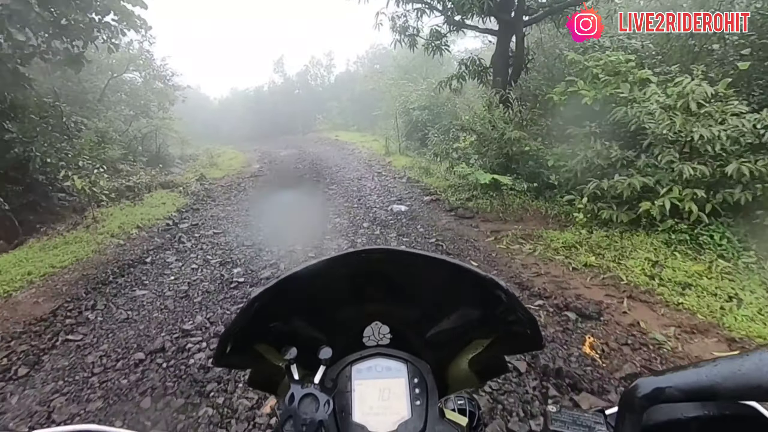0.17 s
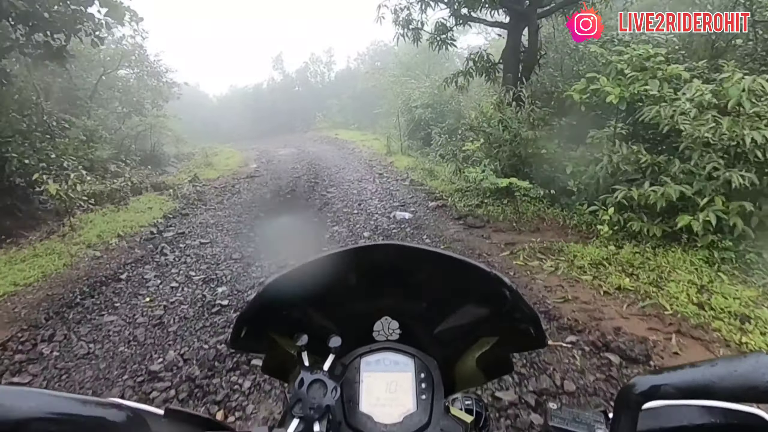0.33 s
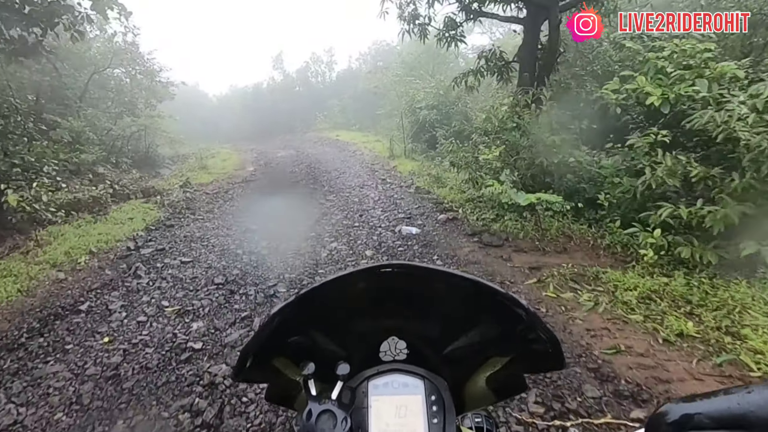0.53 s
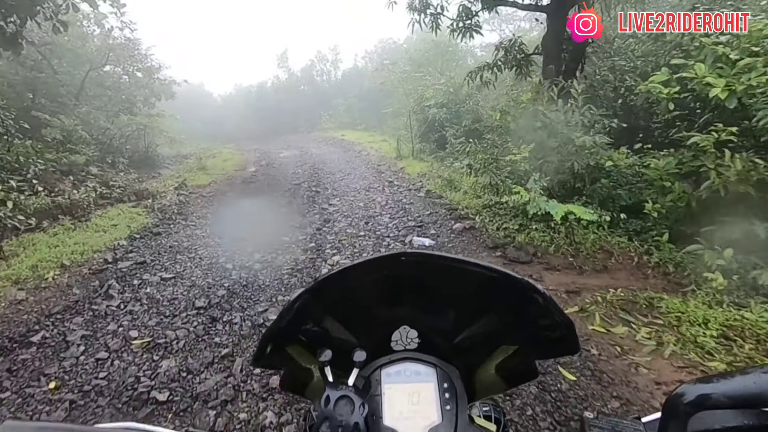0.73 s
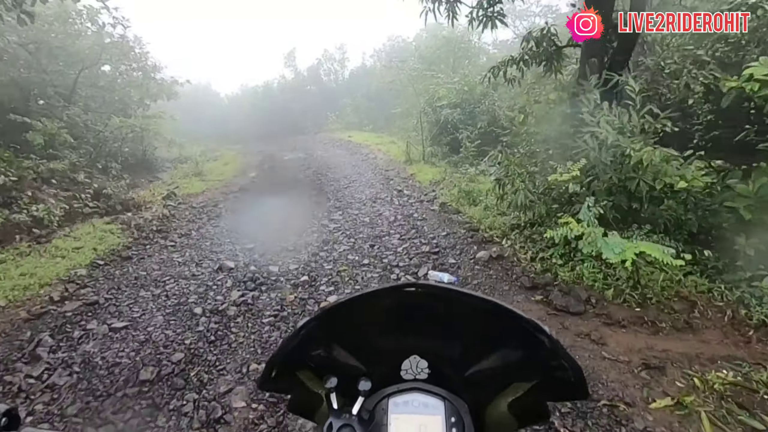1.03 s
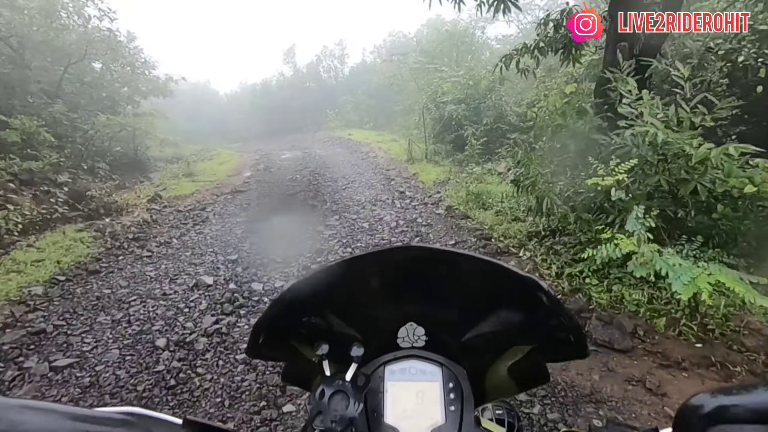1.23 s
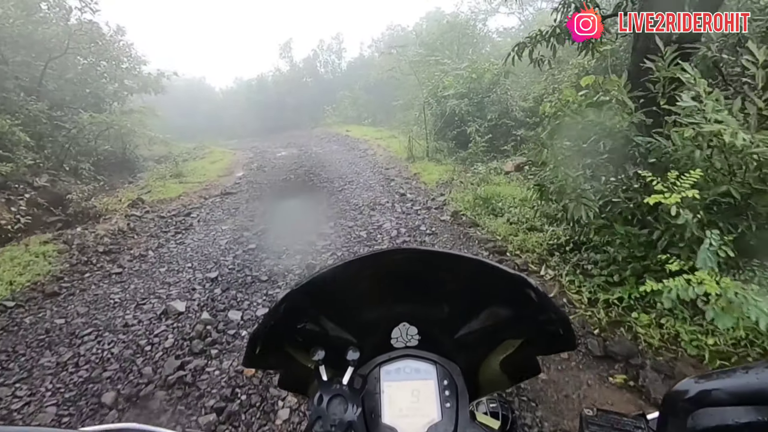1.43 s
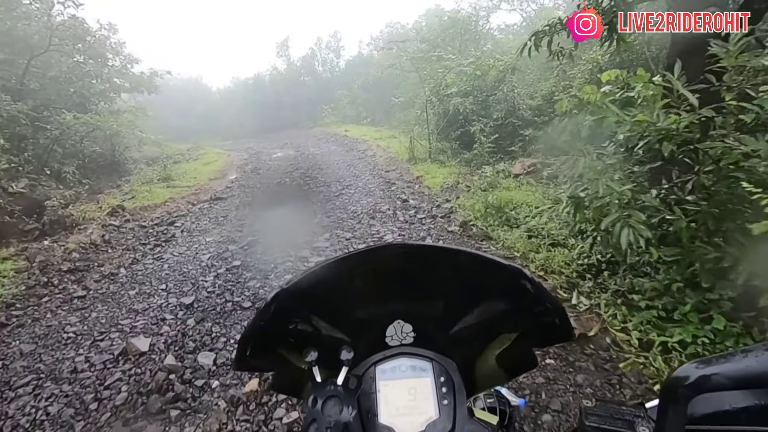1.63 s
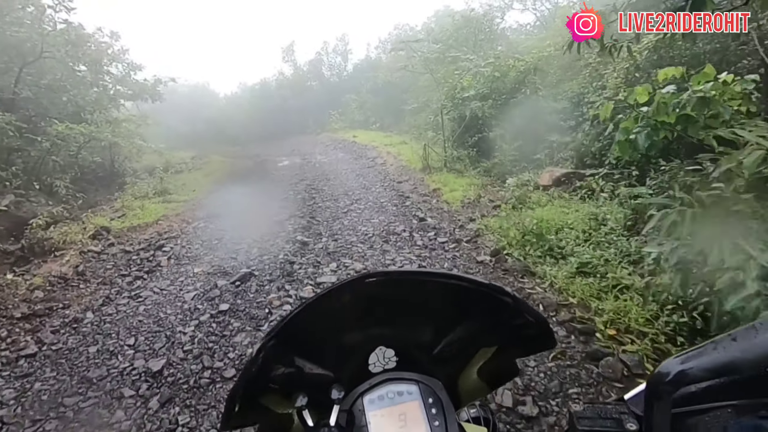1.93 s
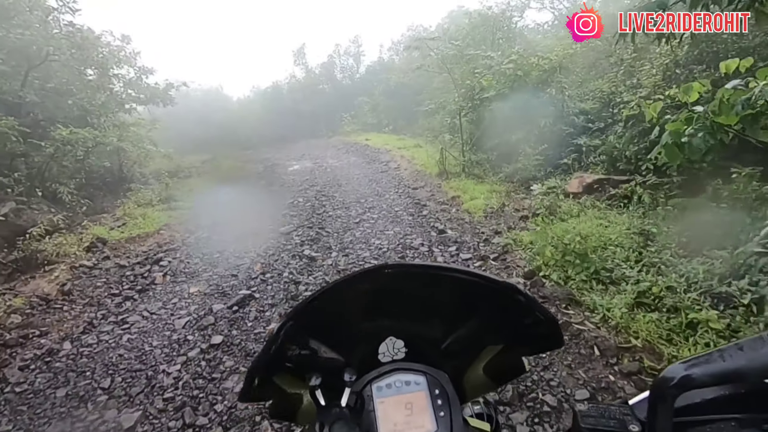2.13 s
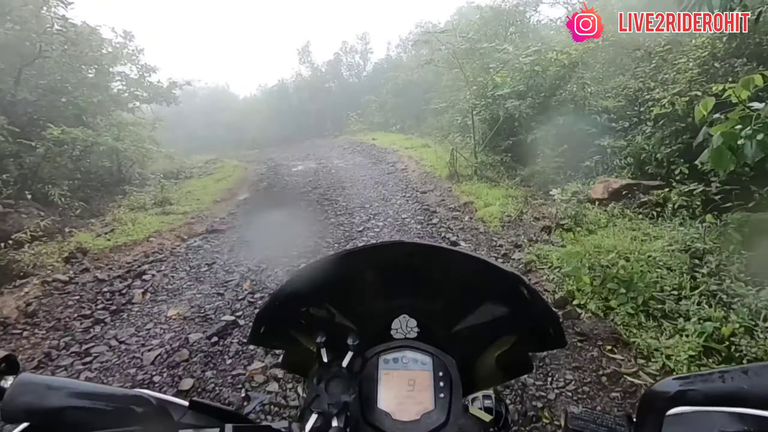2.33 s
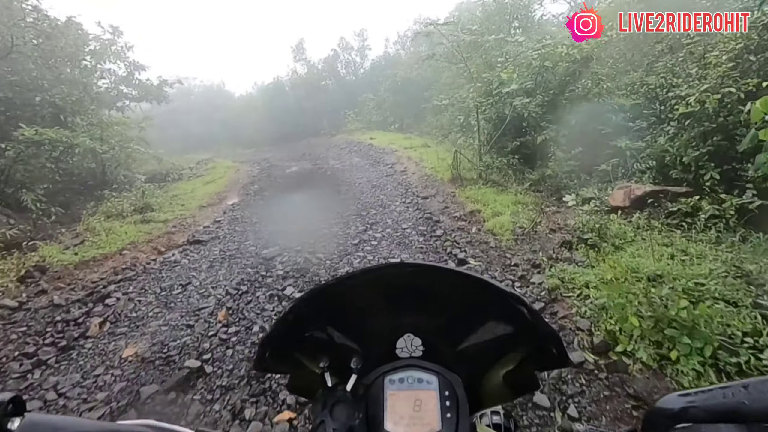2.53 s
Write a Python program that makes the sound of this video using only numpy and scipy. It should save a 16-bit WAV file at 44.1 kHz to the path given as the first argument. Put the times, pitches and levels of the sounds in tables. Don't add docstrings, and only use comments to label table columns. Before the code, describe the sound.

Close, muffled single-cylinder motorcycle chugging at low speed on a wet gravel track, each firing a separate low thump with valve clatter and a thin gear whine. Tyres rumble unevenly, stones clack against the frame and the fork knocks. After about four and a half seconds the sound cuts dead for a fifth of a second, then quickly fades in much louder, with a second deeper exhaust thudding at its own pace.

```python
import sys
import numpy as np
from scipy import signal
from scipy.fft import rfft, irfft, next_fast_len
from scipy.io import wavfile
from scipy.ndimage import uniform_filter1d, map_coordinates

SR = 44100
rng = np.random.default_rng(int(sys.argv[2]) if len(sys.argv) > 2 else 0)


def digitize_waveform(pressure):
    field = np.atleast_2d(pressure).T
    bounded = np.clip(field, -1, 1)
    quanta = np.round(bounded * 32767).astype(np.int16)
    wavfile.write(sys.argv[1], SR, quanta)


def volts(x):
    e = np.asarray(x, float) / 20
    return 10 ** e


N = 268260
T = np.arange(N) / SR
CUT_S = 4.4236

# time in seconds, firings a second.
ENGINE_SPEED = [
    [(0.027, 17.9), (0.647, 15.92), (0.739, 16.79), (0.977, 18.38), (1.789, 17.05), (2.58, 16.74),
     (2.582, 18.2), (3.09, 19.65), (3.595, 13.29), (4.096, 23.08), (4.393, 20.4), (4.424, 17.25)],
    [(4.635, 13.9), (4.665, 13.25), (5.809, 15.13), (6.009, 22.13), (6.045, 21.1)],
]
# time in seconds, thump peak in dB, pipe ring peak in dB.
THROTTLE = [(0, -11.5, -12), (.2, -16.5, -17), (.45, -10.5, -21.5), (.75, -18, -31), (1.1, -13, -16),
            (1.3, -17, -20.5), (1.7, -8, -9.5), (1.96, -15, -15.5), (2.24, -10, -13), (2.55, -11.5, -16.5),
            (2.85, -12.5, -20.5), (3.32, -10.5, -10.5), (3.5, -8, -23.5), (4.3, -14.5, -12.5),
            (4.8, -4, -22), (5.15, -7.5, -21.5), (5.6, -4, -32.5), (6.06, -1, -1.5)]
# pitch in Hz, level in dB, swell in seconds, lead on the firing in seconds.
THUMP_MODES = [(168, 10.3, .0021, .0038), (64, -5.4, .006, .0002), (197, 5.5, .003, .0056)]
# pitch in Hz, level in dB, swell in seconds, lead in seconds.
RING_MODES = [(420, -6.5, .002, .0018), (452, -12, .0055, .0017), (285, -13.5, .0024, .0027)]
# frequency in Hz, density in dB per Hz.
RASP_COLOUR = [(150, -29.5), (250, -3.5), (330, -4), (400, 0.5), (460, 0), (505, -9), (570, -7),
               (630, -19.5), (780, -18), (1600, -67.5)]
# frequency in Hz, density in dB per Hz.
CLATTER_CRUISING = [(350, -33), (600, -8.5), (830, -12.5), (922, -9), (1050, -8.5), (1210, -9.5),
                    (1290, -8), (1390, -9.5), (1720, -16), (2490, -17.5), (3100, -14.5), (4020, -21),
                    (4960, -17.5), (5250, -23.5), (5890, -35.5), (7660, -62), (13000, -120)]
# frequency in Hz, density in dB per Hz.
CLATTER_LABOURING = [(350, -28), (600, -16.5), (667, 2), (733, -3), (905, 1), (1260, -4.5), (1360, -4),
                     (1820, 0), (2120, -8), (2740, 0.5), (3790, -9.5), (4510, -3.5), (4820, -9),
                     (5460, -32.5), (5890, -24), (7660, -67.5), (13000, -120)]
# frequency in Hz, density in dB per Hz.
CLATTER_EASING = [(350, -25.5), (600, -16), (777, -16.5), (846, 0.5), (986, -0.5), (1210, -1.5), (2160, -9),
                  (2960, -8), (4380, -11.5), (4640, -12), (5100, -35), (5460, -23), (5890, -23),
                  (7660, -50.5), (13000, -120)]
# time in seconds, shares (0 to 1) of cruising, labouring and easing.
STAGES = [
    (0, 1, 0, 0),
    (4.5, 1, 0, 0),
    (4.55, 0, 1, 0),
    (5.1, 0, 1, 0),
    (5.3, 0, 0, 1),
]
# time in seconds, tooth pitch in Hz, tooth load in dB.
GEARS = [(0, 1070, -46.5), (.33, 1037, -46.5), (.62, 1070, -56), (.92, 1126, -42.5), (1.28, 1084, -42),
         (1.6, 1070, -40.5), (2.46, 1034, -38), (2.78, 1131, -40.5), (3.05, 1180, -40.5), (3.21, 1060, -38),
         (3.61, 1030, -45), (3.94, 1150, -41.5), (4.41, 1191, -41.5), (4.7, 1037, -46), (5.06, 1090, -44),
         (5.25, 1012, -48.5), (5.78, 1060, -51.5), (6, 1224, -38)]
# time in seconds, firings so far.
DEEP_FIRINGS = [
    [(4.686, 0), (5.001, 4), (5.075, 5), (5.203, 7), (5.429, 11), (5.542, 13), (5.664, 15), (5.998, 20),
     (6.062, 21)],
]
# time in seconds, thud peak in dB.
DEEP_LEVEL = [(4.76, -3.5), (5.02, 0.5), (5.28, -0.6), (5.54, 0.5), (5.8, -0.5), (6.06, -1.5)]
# pitch in Hz, level in dB, swell in seconds, lead in seconds.
THUD_MODES = [(120, 4.6, .004, .0061), (70, -5.2, .0062, .0021), (168, -10, .0056, .0044)]
# time in seconds, frame rumble in dB.
GROUND = [(0, -23), (.3, -18), (.55, -29), (.8, -20.5), (.93, -28.5), (1.18, -24), (1.5, -25), (1.72, -23),
          (2.1, -26), (2.68, -25), (2.9, -20), (3.18, -29), (3.6, -17.5), (3.85, -26), (4.05, -20.5),
          (4.3, -24.5), (4.75, -18), (6, -17)]
# frequency in Hz, density in dB per Hz.
RUMBLE_COLOUR = [(15, -28.5), (25, -6), (45, 0), (80, 0.5), (120, -2.5), (170, -6), (230, -9.5),
                 (320, -18.5), (600, -23), (1200, -88)]
# start in seconds,
# crack peak in dB, dull part over it in dB.
STONES = [(0.241, -37, 10), (0.3913, -36, 6), (1.28, -21, -27), (1.512, -24, 9), (1.5727, -23, 11),
          (2.737, -36, -11), (2.784, -38, -1), (2.938, -26, -2), (3.449, -18, 5), (3.513, -28, 15),
          (3.5864, -25.5, 13), (3.65, -22, 7), (3.7778, -23, 5), (4.0785, -33, 14), (4.3042, -43, 15),
          (4.81, -19, 6.5), (5.056, -20, 0), (5.4725, -23.5, 1.5)]
# frequency in Hz, density in dB per Hz.
CRACK_COLOUR = [(600, -19.5), (1100, 12.5), (1900, 13), (2600, -11), (5000, -8.5), (5800, -45.0), (16000, -90.5)]
DULL_COLOUR = [(150, -28.5), (400, -3), (900, -7), (1300, -25.5), (4000, -76.5)]
# start in seconds, peak in dB.
GUARD_HITS = [
    (.362, -24),
    (.674, -19),
    (.776, -27),
    (3.52, -26),
    (3.62, -23),
    (4.075, -22),
]
# frequency in Hz, density in dB per Hz.
GUARD_COLOUR = [(150, -12), (350, 0), (800, -5), (1200, -14), (2500, -30), (6000, -80)]
# start in seconds,
# peak in dB, pitch in Hz.
JOLTS = [(0.247, -28, 109), (0.319, -16, 138), (0.345, -10, 69.6), (0.369, -7, 177), (0.68, -9.5, 149),
         (.778, -5.5, 143), (0.811, -13, 88), (3.018, -17, 88), (3.47, -8, 153), (3.58, -17, 129),
         (3.627, -11, 143), (3.654, -8, 146), (3.685, -12, 130), (4.069, -9.5, 106), (4.705, -15.5, 127),
         (4.94, 2, 130)]
# frequency in Hz, density in dB per Hz.
SPRAY_COLOUR = [(4800, -38), (5600, -20.5), (6500, 0.5), (7300, -8.5), (8200, -9.5), (10000, -28)]
# frequency in Hz, density in dB per Hz.
DRIZZLE_COLOUR = [(6000, -14), (7500, -3), (9000, -3), (12000, -2), (13300, -5), (14000, -26.5),
                  (15500, -46)]
# time in seconds, level in dB.
FADE = [(4.6, -120), (4.61, -56), (4.63, -24.5), (4.65, -6.5), (4.7, 0.5), (4.75, -0.5)]


def unit(x):
    return x / np.sqrt(np.mean(x ** 2) + 1e-20)


def curves(rows):
    s, *columns = np.transpose(rows)
    return [np.interp(T, s, column) for column in columns]


def stage_db(levels_db):
    return np.dot(levels_db, curves(STAGES))


def wobble(rate):
    return map_coordinates(rng.standard_normal(int(N * rate / SR) + 4), [T * rate])


def hiss(spectrum):
    m = next_fast_len(N + 8192)
    hz, db = np.transpose(spectrum)
    log_hz = np.log(np.fft.rfftfreq(m, 1 / SR) + 1)
    gain = volts(np.interp(log_hz, np.log(hz), db))
    return unit(irfft(rfft(rng.standard_normal(m)) * gain, m)[:N])


def lay(times, shapes):
    start = np.round(times * SR).astype(int)[:, None]
    at = np.clip(start + np.arange(shapes.shape[1]), 0, N)
    return np.bincount(at.ravel(), shapes.ravel(), N + 1)[:N]


def hit(t, db, die_s, rise_s):
    return volts(db - 60 * t / die_s) * (1 - np.exp(-(t / rise_s) ** 2))


def crank(speed):
    s = T[(T >= speed[0][0]) & (T <= speed[-1][0])]
    rate = curves(speed)[0][round(s[0] * SR):][:len(s)]
    return np.transpose([s, np.cumsum(rate) / SR])


def firings(tables):
    columns = map(np.transpose, tables)
    return np.concatenate([np.interp(np.arange(int(count[-1]) + 1), count, s) for s, count in columns])


def puffs(times, modes, scatter_db, detune):
    out = np.zeros(N)
    t = np.arange(SR // 12) / SR
    size, pitch = rng.standard_normal((len(times), 2)).T[:, :, None]
    for hz, db, swell, lead in modes:
        u = t / swell
        swing = np.sin(2 * np.pi * hz * (1 + detune * pitch) * t)
        out += lay(times - lead, volts(db + scatter_db * size) * u * u * np.exp(-u) * swing)
    return out


def strokes(times, lead, length, scatter_db):
    u = np.arange(SR // 12) / SR / length
    size = volts(scatter_db * rng.standard_normal((len(times), 1)))
    return lay(times - lead, size * u * np.exp(1 - u))


def own_bike():
    times = firings(map(crank, ENGINE_SPEED))
    return exhaust(times) + exhaust_rasp(times) + valve_clatter(times) + gear_whine(times)


def exhaust(times):
    thump_db, ring_db = curves(THROTTLE)
    thump = volts(thump_db) * puffs(times, THUMP_MODES, 1.1, .03)
    ring = volts(ring_db) * puffs(times, RING_MODES, 1, .02)
    return thump + ring


def exhaust_rasp(times):
    ring_db = curves(THROTTLE)[1]
    ground_db = curves(GROUND)[0]
    rasp_db = stage_db((-39.5, -44, -42.5)) + 0.12 * (ring_db + 15) + 0.71 * (ground_db + 24)
    rasp_db = rasp_db + 2.5 * np.minimum(T, CUT_S)
    gusts = .28 + strokes(times, .001, .008, 1.8)
    return volts(rasp_db - 2.2) * unit(gusts * hiss(RASP_COLOUR))


def valve_clatter(times):
    load_db = curves(GEARS)[1]
    clatter_db = stage_db((-42.5, -36, -40)) + 0.17 * (load_db - load_db.mean())
    colours = (CLATTER_CRUISING, CLATTER_LABOURING, CLATTER_EASING)
    metal = sum(np.sqrt(share) * hiss(colour) for share, colour in zip(curves(STAGES), colours))
    slaps = unit(1.2 + strokes(times, .021, .004, 1.8))
    return volts(clatter_db + 1.5) * metal * slaps * volts(.9 * wobble(40))


def gear_whine(times):
    whine_hz, whine_db = curves(GEARS)
    surge = strokes(times, .017, .011, 0.79)
    mesh_hz = whine_hz * (1 + .11 * (surge - surge.mean()))
    casing_hz, width_hz, lift = (1044, 1170), 30, 1.3
    casing = 1 + lift * sum(1 / (1 + ((mesh_hz - hz) / width_hz) ** 2) for hz in casing_hz)
    turn = 2 * np.pi * np.cumsum(mesh_hz) / SR
    steady, flutter_hz = 1.4, 140
    band = (steady + wobble(flutter_hz)) * np.sin(turn) + wobble(flutter_hz) * np.cos(turn)
    return volts(whine_db - 1.5) * unit(casing * band * (1.8 + strokes(times, .024, .007, 2.1)))


def deep_bike():
    return volts(curves(DEEP_LEVEL)[0]) * puffs(firings(DEEP_FIRINGS), THUD_MODES, .6, .015)


def gravel():
    return ground_rumble() + kicked_stones() + guard_hits() + fork_jolts()


def ground_rumble():
    roll = hiss(RUMBLE_COLOUR)
    roll = roll / np.sqrt(np.abs(uniform_filter1d(roll ** 2, size=SR // 9)))
    return volts(curves(GROUND)[0] - 2.5) * unit(volts(2.1 * wobble(22)) * roll)


def kicked_stones():
    s, db, dull_db = np.transpose(STONES)[:, :, None]
    burst = hit(np.arange(SR // 15) / SR, db, 0.056, 0.0021)
    bright = lay(s[:, 0], burst) * hiss(CRACK_COLOUR)
    dull = lay(s[:, 0], volts(dull_db) * burst) * hiss(DULL_COLOUR)
    return volts(-12.5) * (bright + dull)


def guard_hits():
    s, db = np.transpose(GUARD_HITS)[:, :, None]
    return lay(s[:, 0], hit(np.arange(SR // 15) / SR, db, .07, .002)) * hiss(GUARD_COLOUR)


def fork_jolts():
    s, db, hz = np.transpose(JOLTS)[:, :, None]
    t = np.arange(SR // 15) / SR
    u = t * hz / .27
    swing = -volts(db + 3.5) * u * u * np.exp(-u) * np.sin(2 * np.pi * hz * t)
    return lay(s[:, 0] - 0.19 / hz[:, 0], swing)


def wet_air():
    turn_s, start_s, fling_db = .47, .33, 1
    fling = fling_db * np.cos(2 * np.pi * (T - start_s) / turn_s)
    spray_db = stage_db((-72.5, -64.5, -66)) + fling
    trees_s, open_db = 1.6, -10.5
    drizzle_db = stage_db((-75.5, -73, -71)) + open_db * np.clip(1 - T / trees_s, 0, 1)
    tick = volts(-37.5 - 60 * T / 0.005)
    spray = (tick + volts(spray_db + 1.5 * wobble(30))) * hiss(SPRAY_COLOUR)
    drizzle = (tick + volts(drizzle_db + 1.6 * wobble(40))) * hiss(DRIZZLE_COLOUR)
    return spray + drizzle


def scene():
    return (own_bike() + deep_bike() + gravel() + wet_air())[None]


def low_pass(x):
    return signal.sosfilt(signal.butter(12, 15700, fs=SR, output="sos"), x)


def record(dry):
    dry = dry - uniform_filter1d(dry, size=SR // 8)
    near = np.exp(-((CUT_S - T) / .0009) ** 2)
    swing = dry * (1 - near) - .25 * near
    x = swing * np.where(T < CUT_S, 1, volts(curves(FADE)[0]))
    x = x / (1 + np.abs(x / .97) ** 6) ** (1 / 6)
    return low_pass(x)


dry = scene()
out = record(dry)
digitize_waveform(out)
```